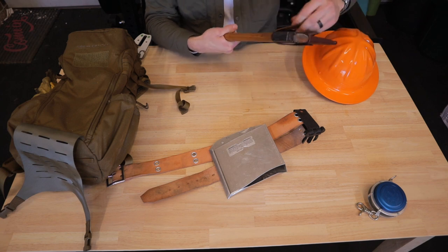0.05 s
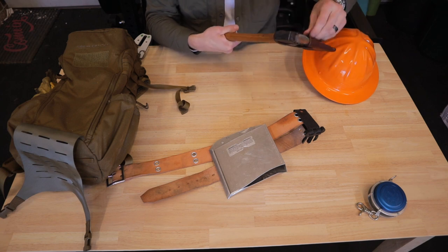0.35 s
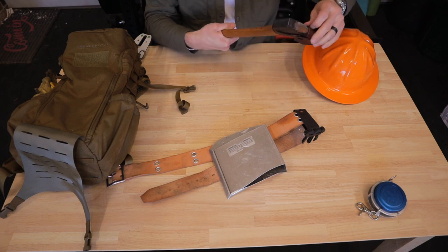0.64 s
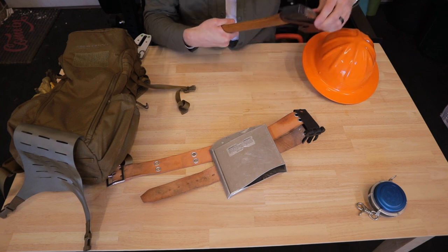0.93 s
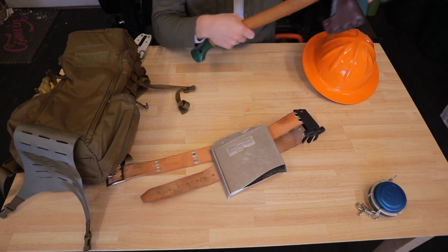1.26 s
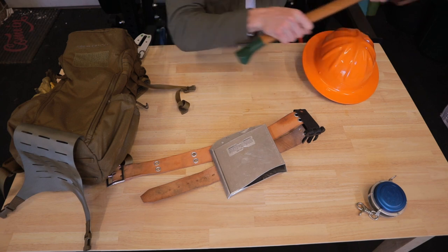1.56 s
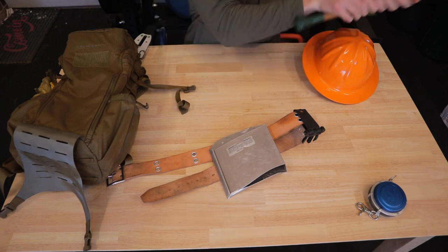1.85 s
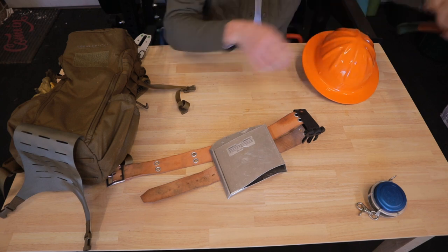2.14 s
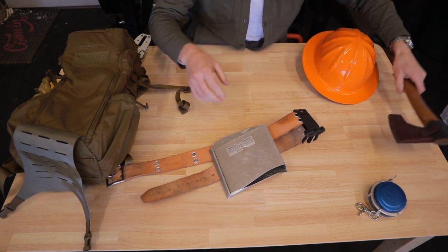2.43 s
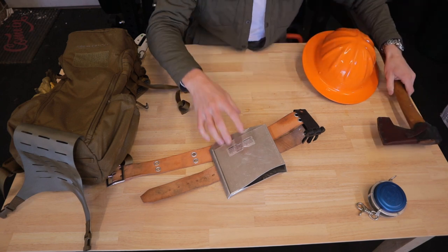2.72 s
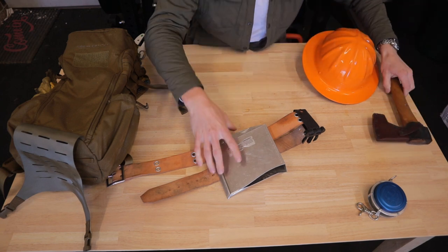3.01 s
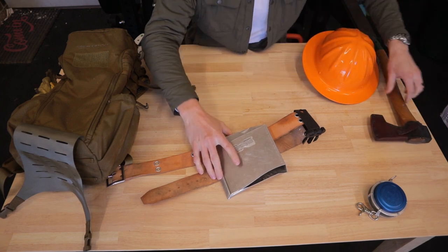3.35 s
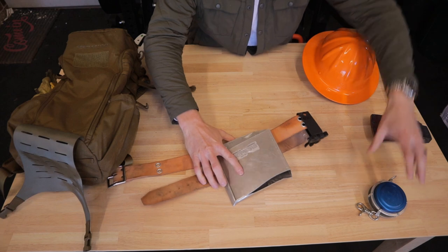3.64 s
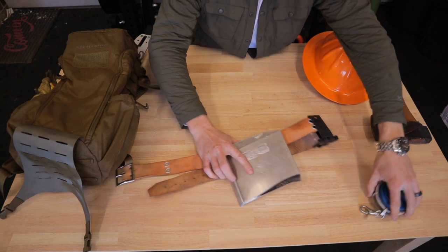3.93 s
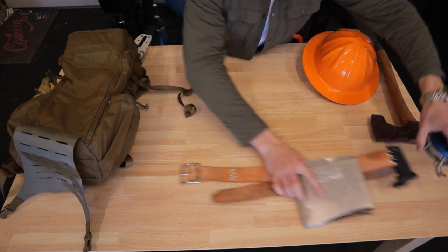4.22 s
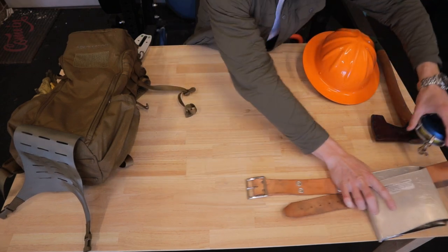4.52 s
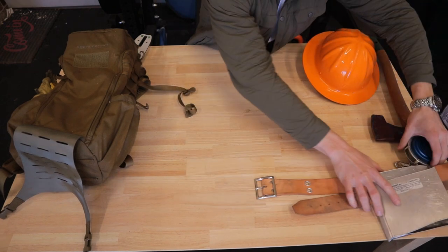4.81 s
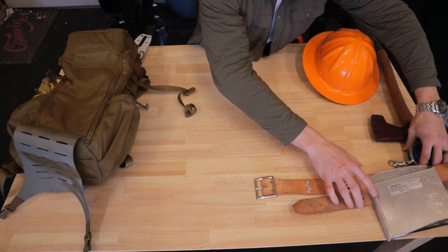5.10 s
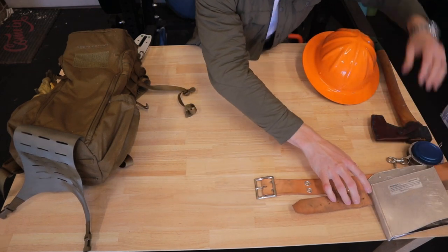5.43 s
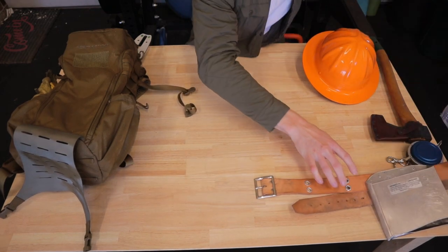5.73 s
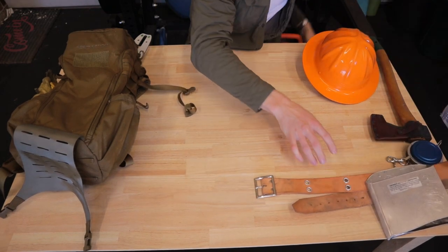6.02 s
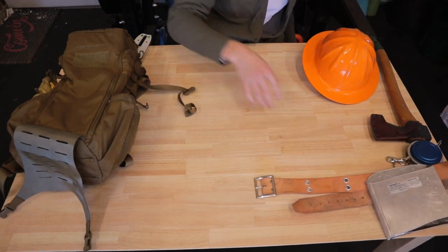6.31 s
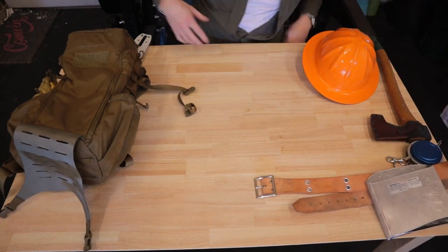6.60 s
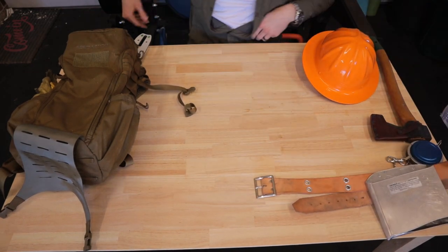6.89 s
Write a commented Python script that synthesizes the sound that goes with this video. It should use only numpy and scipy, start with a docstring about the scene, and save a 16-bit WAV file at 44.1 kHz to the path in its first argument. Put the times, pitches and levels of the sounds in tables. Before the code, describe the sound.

An axe is handled and laid on a wooden table, then a leather belt with a metal pouch scrapes aside amid knocks and clinks.

```python
"""Fingertips tick faintly on an axe and bump a hard hat, at a wooden table in a slightly live room.
The sheath's stud snaps shut, a palm slides along the haft, and the axe is laid down. A leather belt with
a metal pouch is tugged and dragged aside, and a tape measure with a steel clip is set down, rocking.
Sleeves rustle in between. Every hit is a short crack plus the ringing modes of the object struck;
every rub is a stream of tiny slips, coloured by the material."""
import sys
import numpy as np
from scipy import signal
from scipy.fft import rfft, irfft
from scipy.io import wavfile

SR = 44100
rng = np.random.default_rng(int(sys.argv[2]) if len(sys.argv) > 2 else 0)


def put_to_file(sound):
    """Save the sound as 16-bit audio at rate SR, in the file named by the first command-line argument."""
    columns = np.atleast_2d(sound).T  # one column per channel
    safe = np.clip(columns, -1, 1)
    whole_steps = np.round(safe * 32767)
    wavfile.write(sys.argv[1], SR, whole_steps.astype(np.int16))


N = 306936

# Room tone: (frequency [Hz], density [dB])
AIR_SPECTRUM = [(15, -28.5), (25, -0.5), (39, -7.5), (70, -2.5), (123, -0.5), (166, -2), (394, -8.5),
                (439, -5.5), (476, -9), (1560, -14), (1890, -15), (8140, -20), (10400, -22.5), (14800, -22),
                (16000, -30)]
# Decay of the reverb tail: (frequency [Hz], t60 [s])
ROOM_T60 = [(100, 0.64), (400, 0.93), (1200, .75), (3500, 0.67), (8000, 0.5), (15000, .25)]
# EQ of the reverb tail: (frequency [Hz], gain [dB])
ROOM_EQ = [(60, -14.5), (200, -4), (450, -9.5), (1200, -4), (3000, -4.5), (7000, -5), (15000, -2)]
# Early reflections off nearby surfaces: (delay [s], level [dB])
ECHOES = [(0.0107, -15.5), (0.016, -19.5), (.026, -20)]

# Arm movements: (time of peak speed [s], half length [s], level [dB])
REACHES = [(1.42, 0.39, -66.5), (1.86, 0.21, -63.5), (2.55, 0.62, -76.5), (3.8, 0.25, -62),
           (5.23, 0.065, -54), (5.55, 0.5, -70.5), (6.9, .4, -69.5)]
# Two short tugs, the slack is taken up, then the strap runs out and the pouch slides after it:
# (time [s], length [s], pouch level [dB], leather level [dB])
BELT_PULLS = [(3.663, 0.022, -46, -57.5), (3.816, 0.036, -48, -58), (3.97, 0.092, -49.5, -57),
              (4.067, .14, -44.5, -51), (4.191, 0.26, -39, -50.5)]
# Tone of each rub: (frequency [Hz], density [dB])
CLOTH_SPECTRUM = [(150, -5.5), (600, 6), (1500, 4.5), (3500, 0), (8500, -5.5), (10500, -12), (13500, -14.5),
                  (16000, -16)]
PALM_SPECTRUM = [(1500, -16), (4000, 3), (8500, 0.5), (10500, -8), (13500, 1), (16000, -8)]
LEATHER_SPECTRUM = [(500, -0.5), (2500, 4), (4500, 4.5), (6500, 0), (8600, 4), (10300, -12), (13000, -3.5),
                    (16000, -14.5)]
SCRAPE_SPECTRUM = [(40, -28), (130, -9), (260, -16), (420, -6), (700, 2.5), (1300, -1), (2500, -3),
                   (5000, -17), (12000, -23.5)]
# Resonances of the sliding pouch: (frequency [Hz], bandwidth [Hz], level [dB])
POUCH_MODES = [(402, 98, -8.5), (446, 61, -4), (904, 63, -1), (1009, 72, 3.5), (1229, 50, -4),
               (1553, 24, -1), (1740, 120, -14), (2160, 76, -8), (3180, 85, -16)]

# Single hits; hardness is the contact's low-pass cutoff: (time [s], level [dB], hardness [Hz])
FINGER_TICKS = [(.327, -57, 12000), (.454, -59.5, 8280), (.714, -62, 11000), (.738, -57.5, 5800),
                (1.803, -53.5, 3300), (2.035, -58.5, 12000), (2.794, -60.5, 2900), (6.35, -65, 3470),
                (6.422, -64, 3500)]   # fingers and nails on the axe and the gear
SHEATH_SNAP = [(1.067, -50, 12000), (1.0755, -44.5, 4000), (1.0908, -27.5, 13300)]   # the stud touches, catches and snaps home
AXE_CLINKS = [(.9225, -60, 780), (1.8905, -34, 7050)]   # the axe head is knocked
TABLE_THUMPS = [(3.02, -34.5, 5200), (3.149, -38.5, 3900), (3.864, -54, 799), (5.037, -42.5, 600),
                (5.222, -44.5, 480)]   # weight comes down on the table top
# Bouncing hits: (time [s], level [dB], hardness [Hz], loss per bounce [dB])
HAT_TAPS = [(.328, -65.5, 2530, 14), (.456, -61, 1990, 9), (.533, -59.5, 1197, 13), (.678, -62.5, 2500, 7)]   # the hand bumps the hard hat, which wobbles once
HANDLE_KNOCKS = [(1.773, -47.5, 1310, 9.5), (3.3475, -27, 2800, 4), (3.652, -53, 1500, 0.5)]   # the wooden handle lands
METAL_CLICKS = [(3.842, -46, 9000, 2), (4.049, -40, 9270, 19), (4.096, -39, 8060, 11),
                (4.418, -46.5, 12000, 12), (4.796, -36.5, 6160, 16), (4.8372, -33.5, 9000, 17.5),
                (5.019, -27.5, 10890, 4.5), (5.195, -46, 9000, 5), (5.246, -41.5, 10660, 20),
                (5.3597, -30.5, 4560, 5.5)]   # steel hardware is jolted and chatters
# A hollow case lands on an edge, then tips onto its face:
# (time [s], level [dB], hardness [Hz], tipping time [s], face level over edge [dB])
CASE_KNOCKS = [(3.063, -46, 236, 0.00604, 3.5), (3.84, -43.5, 1060, 0.031, 0), (4.05, -40.5, 890, 0.021, 0),
               (4.7953, -21, 2600, .026, -5), (5.0185, -22.5, 4600, .017, 3), (5.2085, -34, 940, .011, 0.5),
               (5.412, -38.5, 262, 0.0084, -4), (5.606, -54, 1510, 0.03, -2)]
# Small metal accents: (time [s], level [dB])
BUCKLE_RATTLES = [(4.217, -51), (4.255, -45.5), (4.299, -44)]   # the buckle skips over the wood
CLIP_PINGS = [(4.518, -55), (4.608, -58), (4.796, -46), (4.893, -61), (5.019, -53), (5.163, -68),
              (5.246, -62), (5.374, -62.5)]   # the steel clip is flicked

# The ring of each object, its strong modes: (frequency [Hz], level over the crack [dB], t60 [s])
FINGER_MODES = [(5330, -8.5, 0.011), (7950, -41, 0.015)]
HAT_MODES = [(994, 1.8, 0.024), (1125, -1.9, 0.023)]
SHEATH_MODES = [(274, -22.5, 0.022), (753, -13.5, 0.029), (1570, -8.5, 0.016), (2620, -6, 0.01),
                (3300, -4.5, 0.01), (7980, -10, 0.0063)]
AXE_MODES = [(598, -10, 0.025), (870, -14.5, 0.1), (1580, -3.5, 0.051), (1787, -10, 0.11), (2530, -1, 0.04),
             (2820, -3, 0.019), (2915, -5.5, 0.038), (3750, 2, 0.016), (4060, -1.5, 0.017)]
HANDLE_MODES = [(305, -13, 0.085), (377, -12, 0.12), (788, -6, 0.025), (1016, -8.5, 0.066),
                (1144, -7, 0.075), (1322, -2, 0.031), (1534, -11, 0.075)]
TABLE_MODES = [(56.4, -10.5, 0.17), (134, -5, 0.066), (286, -8.5, .07), (383, -2.5, 0.087),
               (461, -3.5, 0.072), (920, -12, .08), (2360, -17.5, .15)]
CASE_MODES = [(279, -19, 0.044), (400.8, -4, 0.16), (438.4, -9, 0.14), (500, -8, 0.045), (632, -7, 0.11),
              (696, -6.5, 0.08), (852, -7, 0.026), (875, -10, 0.063), (1046, -4, 0.07), (1263, -11.5, 0.16),
              (1382, -8.5, 0.068), (1702, -10, 0.2), (2737, -11, .15)]
METAL_MODES = [(981, -10, 0.078), (2255, -15.5, 0.15), (2750, -30.5, .06), (3410, -21, 0.056),
               (5300, -33.5, 0.026), (7430, -21, .03)]
BUCKLE_MODES = [(3326, 8, 0.065), (3650, 1.5, 0.045)]
CLIP_MODES = [(9400, -10.5, .1), (12758, -1, .13), (14562, -1.5, .1), (14626, 3, 0.1016)]
# The crack of each object, its crowd of weak, short modes: (frequency [Hz], density [dB])
FINGER_CRACK = [(200, -17), (1000, -8), (2500, -8), (6500, -5.5), (10000, -6.5), (16000, -20)]
SHEATH_CRACK = [(70, -39), (260, -21), (500, -21.5), (800, 2), (3500, -0.5), (5000, -4.5), (8500, -5.5),
                (10500, -18), (15000, -12)]
AXE_CRACK = [(200, -10), (700, -19), (1600, 5), (4000, -5), (5500, -25), (15000, -24)]
HANDLE_CRACK = [(60, -22), (250, -1), (550, -1.5), (1150, 7), (2200, -0.5), (4000, -12.5), (9000, -27),
                (15000, -22)]
TABLE_CRACK = [(30, -35), (55, -8.5), (400, -0.5), (700, -9.5), (2500, -10), (4500, -18), (8000, -19),
               (14000, -20.5)]
CASE_CRACK = [(50, -20.5), (260, -13), (420, 5.5), (1000, 7.5), (2000, 7), (4000, -10), (8000, -28.5),
              (15000, -13.5)]
METAL_CRACK = [(100, -47), (500, -6), (1200, 2), (3200, 2), (4500, -3), (8500, -8.5), (10500, -21),
               (15000, -15)]
CLIP_CRACK = [(1000, -15.5), (6000, 5.5), (15000, -7.5)]


def from_db(db):
    """Decibels to gain."""
    return 10 ** (np.asarray(db) / 20)


def rms_one(x):
    """Scale to rms 1."""
    return x / np.sqrt(np.mean(x ** 2) + 1e-20)


def energy_one(x):
    """Scale to the energy of a unit click."""
    return x / np.sqrt(np.sum(x ** 2) + 1e-20)


def at_hz(points, hz):
    """Read a table on a log-frequency axis."""
    f, value = np.transpose(points)
    return np.interp(np.log(np.maximum(hz, 1)), np.log(f), value)


def colour(x, spectrum, size=4096):
    """Minimum-phase EQ: shapes the tone without pre-ringing."""
    gain = from_db(at_hz(spectrum, np.fft.rfftfreq(size, 1 / SR)))
    cepstrum = irfft(np.log(gain))
    cepstrum[1:size // 2] *= 2
    cepstrum[size // 2 + 1:] = 0
    return signal.fftconvolve(x, irfft(np.exp(rfft(cepstrum))))[:len(x)]


def resonate(x, hz, width):
    """One resonance with gain 1 at its peak."""
    r = np.exp(-np.pi * width / SR)
    poles = [1, -2 * r * np.cos(2 * np.pi * hz / SR), r * r]
    return signal.lfilter(np.array([1, 0, -1]) * (1 - r * r) / 2, poles, x)


def decay(t, t60):
    """Envelope that falls 60 dB in t60."""
    return np.exp(-np.log(1000) * t / t60)


def room_tone(air_db=-70.5, hum_hz=128.7, hum_db=-80):
    """A bed of quiet air with a faint low hum."""
    air = rms_one(colour(rng.standard_normal(N), AIR_SPECTRUM))
    hum = rms_one(np.sin(2 * np.pi * hum_hz * np.arange(N) / SR))
    return from_db(air_db) * air + from_db(hum_db) * hum


def reverb(x, size=44100):
    """A few early reflections, then a diffuse tail whose treble dies first."""
    t, hz = np.arange(size) / SR, np.fft.rfftfreq(size, 1 / SR)
    centres = np.geomspace(60, 16000, 9)
    white = rfft(rng.standard_normal(size))
    bands = [irfft(white * at_hz(np.c_[centres, share], hz), size) for share in np.eye(len(centres))]
    tail = sum(band * decay(t, at_hz(ROOM_T60, centre)) for band, centre in zip(bands, centres))
    tail *= np.clip((t - .006) / .004, 0, 1)   # reflections thicken after a short gap
    mid_energy = np.sum(decay(t, at_hz(ROOM_T60, 1000)) ** 2)
    response = colour(tail / np.sqrt(mid_energy), ROOM_EQ)
    for delay, db in ECHOES:
        response[round(delay * SR)] += from_db(db)
    return signal.fftconvolve(x, response)[:N]


def drift(rate):
    """Random modulation of rms 1, with `rate` new values a second."""
    steps = np.arange(N) / SR * rate
    values = rng.standard_normal(N // 20)
    return rms_one(np.interp(steps, np.arange(len(values)), values))


def friction(slips_per_s, spread_db, judder_db=0, judder_hz=0):
    """Tiny slips of uneven size; judder clumps them as the surface catches and lets go."""
    slips = rng.random(N) < slips_per_s / SR
    sizes = from_db(spread_db * np.minimum(rng.exponential(1, N), 4))
    signs = rng.choice([-1, 1], N)
    return rms_one(slips * sizes * signs * from_db(judder_db * drift(judder_hz)))


def stroke(start, length, bite_s, coast):
    """Envelope of a slide: it takes hold, keeps its speed, then fades over `coast` times its length."""
    t = np.arange(N) / SR - start
    return np.exp(np.minimum(t, 0) / bite_s - np.maximum(t - length, 0) / (coast * length))


def sleeves(still_db=-87):
    """Cloth rubs softly on cloth, swelling and fading with each movement of the arms."""
    t = np.arange(N) / SR
    swells = [from_db(db) * np.exp(-.5 * ((t - s) / half) ** 2) for s, half, db in REACHES]
    rub = friction(7000, spread_db=2.2, judder_db=.9, judder_hz=90)
    return (from_db(still_db) + np.max(swells, axis=0)) * rms_one(colour(rub, CLOTH_SPECTRUM))


def palm(level_db=-66.5):
    """Dry skin hisses over the wooden haft, swelling until the hand lets go."""
    hiss = rms_one(colour(friction(6000, spread_db=2.5), PALM_SPECTRUM))
    return from_db(level_db) * stroke(start=1.88, length=.15, bite_s=.42, coast=.25) * hiss


def pouch_scrape():
    """The dragged pouch grinds over the wood and sings in its resonances."""
    pulls = [(s, length, db) for s, length, db, _ in BELT_PULLS]
    pulls.append((4.424, .012, -36))   # it catches hard on the wood once
    strokes = [from_db(db) * stroke(s, length, bite_s=.022, coast=.56) for s, length, db in pulls]
    slips = friction(2000, spread_db=3.95)
    singing = rms_one(sum((-1) ** k * from_db(db) * resonate(slips, hz, width)
                          for k, (hz, width, db) in enumerate(POUCH_MODES)))
    grit = rms_one(colour(slips, SCRAPE_SPECTRUM))
    return np.max(strokes, axis=0) * (from_db(-4) * singing + from_db(-8) * grit)


def strap_hiss(trim_db=.35):
    """The leather strap slides with each pull, in a fine, bright stream of slips."""
    strokes = [from_db(db + trim_db) * stroke(s, length, bite_s=.039, coast=1.05)
               for s, length, _, db in BELT_PULLS]
    rub = friction(9000, spread_db=2.7, judder_db=2, judder_hz=150)
    return np.max(strokes, axis=0) * rms_one(colour(rub, LEATHER_SPECTRUM))


def scatter(t, t60, snap):
    """A sharp pulse of height `snap`, then the dying jumble of its reflections inside a body."""
    burst = energy_one(rng.standard_normal(len(t)) * decay(t, t60))
    burst[0] += snap
    return burst


def struck(contacts, modes, crack_spectrum, crack_t60, snap, size=22050):
    """Each contact gives a crack and sets the modes ringing; a softer contact passes less treble."""
    out, t = np.zeros(N + size), np.arange(size) / SR
    mode_hz, mode_db, _ = np.transpose(modes)
    rings = np.array([energy_one(np.sin(2 * np.pi * hz * t) * decay(t, t60)) for hz, _, t60 in modes])
    edge_hz = .87 * mode_hz[0]   # a body radiates little below its lowest mode
    rings = signal.sosfilt(signal.butter(4, edge_hz, "high", fs=SR, output="sos"), rings)
    for s, db, hardness_hz in contacts:
        strengths = from_db(mode_db + 1.5 * rng.standard_normal(len(modes)))   # a new spot each blow
        signs = rng.choice([-1, 1], len(modes))   # each mode swings out or in at that spot
        crack = energy_one(colour(scatter(t, crack_t60, snap), crack_spectrum))
        softness = signal.butter(2, hardness_hz, fs=SR, output="sos")
        blow = energy_one(signal.sosfilt(softness, crack + (signs * strengths) @ rings))
        start = round(s * SR)
        out[start:start + size] += from_db(db) * blow * np.sqrt(SR / 100)   # level as rms over 10 ms
    return out[:N]


def stray(span_s, per_s, level_db, hardness_hz, spread_db=3):
    """Faint contacts of uneven strength, each at a random moment in its own slot of the span."""
    start, end = span_s
    jitter, strength = rng.random((32, 2)).T
    times = start + (np.arange(len(jitter)) + jitter) / per_s
    levels = level_db + spread_db * (2 * strength - 1)
    return [(s, db, hardness_hz) for s, db in zip(times, levels) if s < end]


def bouncing(landings, gap_s, gap_ratio, softening, count):
    """Each landing becomes a short run of touches, every one weaker and duller than the last."""
    delays = np.r_[0, np.cumsum(gap_s * gap_ratio ** np.arange(count - 1))]
    return [(s + delay, db - k * loss_db, hz * softening ** k)
            for s, db, hz, loss_db in landings for k, delay in enumerate(delays)]


def fingers():
    """Nails and fingertips tick on the gear, with fainter ticks while the axe is held."""
    grip = stray(span_s=(0, 3.2), per_s=2.2, level_db=-69.5, hardness_hz=4000)
    return struck(FINGER_TICKS + grip, FINGER_MODES, FINGER_CRACK, crack_t60=.036, snap=.97)


def hard_hat():
    """The bumped shell wobbles once, giving a light double tap."""
    taps = bouncing(HAT_TAPS, gap_s=.026, gap_ratio=1, softening=.8, count=2)
    return struck(taps, HAT_MODES, HANDLE_CRACK, crack_t60=.041, snap=.43)


def hardware():
    """Jolted steel chatters and jiggles, the buckle skips over the wood and the tape's clip pings."""
    clicks = bouncing(METAL_CLICKS, gap_s=.018, gap_ratio=1.1, softening=.72, count=3)
    jiggles = stray(span_s=(4.05, 5.3), per_s=8, level_db=-50.5, hardness_hz=10000)
    buckle_hardness_hz, clip_hardness_hz = 6040, 14000
    rattles = [(s, db, buckle_hardness_hz) for s, db in BUCKLE_RATTLES]
    pings = [(s, db, clip_hardness_hz) for s, db in CLIP_PINGS]
    return (struck(clicks + jiggles, METAL_MODES, METAL_CRACK, crack_t60=.018, snap=.34)
            + struck(rattles, BUCKLE_MODES, METAL_CRACK, crack_t60=.021, snap=.16)
            + struck(pings, CLIP_MODES, CLIP_CRACK, crack_t60=.035, snap=.3))


def table_top():
    """The wooden top thumps as weight settles on it."""
    touches = []
    for s, db, hardness_hz in TABLE_THUMPS:
        touches += [(s, db, hardness_hz),   # first touch
                    (s + .006, db - 4.5, 180),   # the dull weight behind it
                    (s + .0235, db - 10.5, 700)]   # one soft rebound
    return struck(touches, TABLE_MODES, TABLE_CRACK, crack_t60=.023, snap=1)


def axe():
    """The sheath's stud snaps shut, the steel head clinks and the handle bounces on the table."""
    knocks = bouncing(HANDLE_KNOCKS, gap_s=.0135, gap_ratio=1.2, softening=.75, count=4)
    return (struck(SHEATH_SNAP, SHEATH_MODES, SHEATH_CRACK, crack_t60=.022, snap=.19)
            + struck(AXE_CLINKS, AXE_MODES, AXE_CRACK, crack_t60=.02, snap=.27)
            + struck(knocks, HANDLE_MODES, HANDLE_CRACK, crack_t60=.023, snap=.38))


def rocking_cases():
    """The hollow pouch and tape case knock on the table: edge first, then flat on the face."""
    touches = []
    for s, db, edge_hz, tip_s, face_db in CASE_KNOCKS:
        face_hz = min(.45 * edge_hz, 1400)   # the face lands softer than the edge
        touches += [(s, db, edge_hz),
                    (s + tip_s, db + face_db, face_hz),
                    (s + 1.72 * tip_s, db + face_db - 8.5, face_hz)]   # one more rock, sooner and weaker
    return struck(touches, CASE_MODES, CASE_CRACK, crack_t60=.059, snap=.823)


def scene(low_cut_hz=43.9):
    """All the handling, heard in the room by one microphone that misses the deepest bass."""
    axe_bus = fingers() + hard_hat() + axe()
    gear_bus = table_top() + rocking_cases() + hardware()
    rub_bus = pouch_scrape() + strap_hiss() + sleeves() + palm()
    low_cut = signal.butter(2, low_cut_hz, "high", fs=SR, output="sos")
    buses = signal.sosfilt(low_cut, np.array([axe_bus, gear_bus, rub_bus]))
    sends_db = [-2.06, 0, -.5]
    return (buses.sum(axis=0) + reverb(from_db(sends_db) @ buses) + room_tone())[None]


def record(dry):
    """A steep high cut at 16 kHz."""
    return signal.sosfilt(signal.ellip(12, .1, 80, 16000, fs=SR, output="sos"), dry)


dry = scene()
out = record(dry)
put_to_file(out)
```